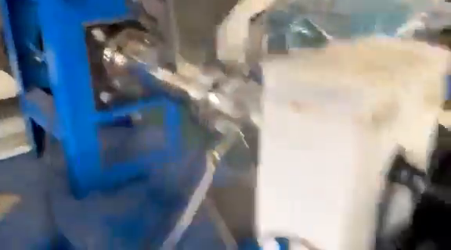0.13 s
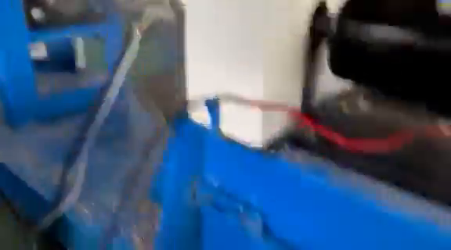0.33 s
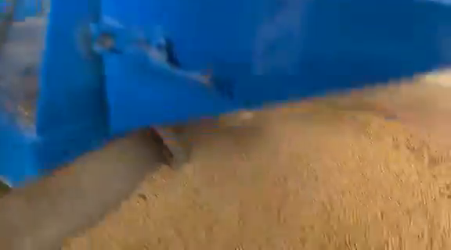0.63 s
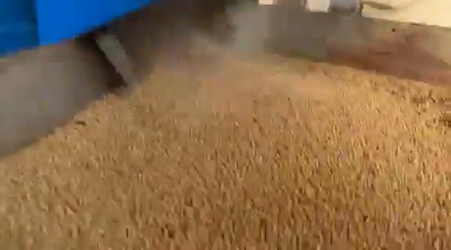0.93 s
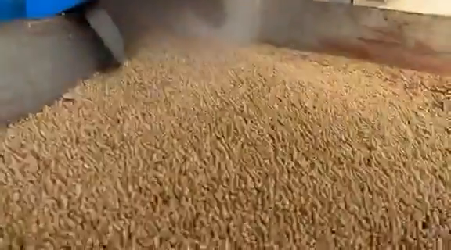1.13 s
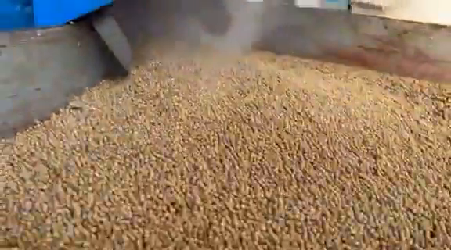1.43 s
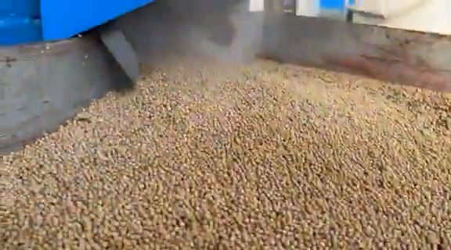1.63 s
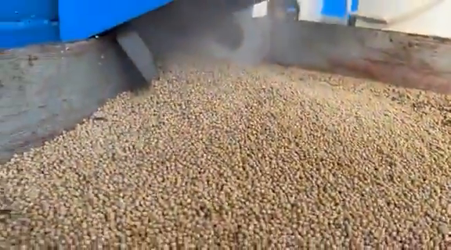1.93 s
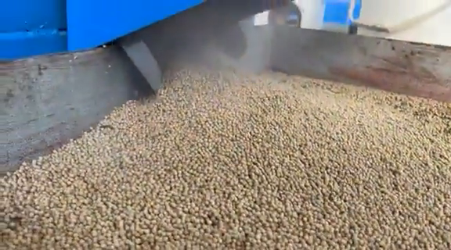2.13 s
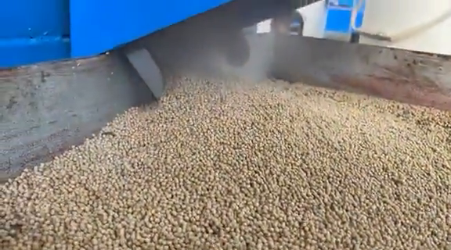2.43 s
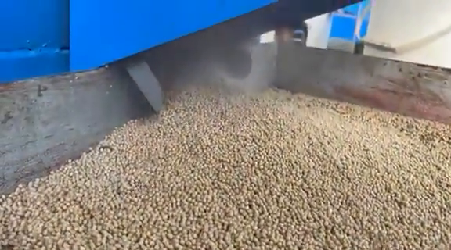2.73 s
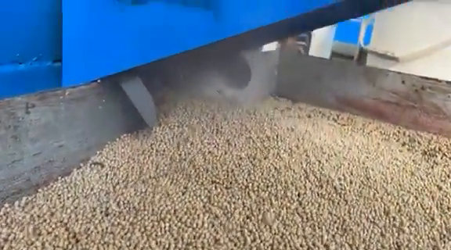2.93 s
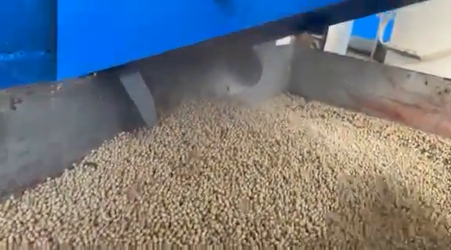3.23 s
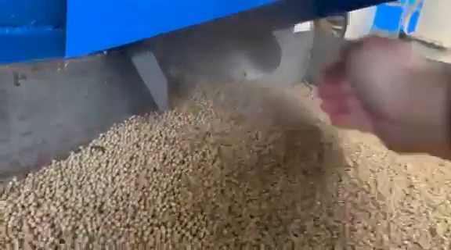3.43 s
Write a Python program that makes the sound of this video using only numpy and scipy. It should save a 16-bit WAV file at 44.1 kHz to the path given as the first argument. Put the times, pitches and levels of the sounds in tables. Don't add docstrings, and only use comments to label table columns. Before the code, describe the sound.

Loud steady machine drone and wavering motor whine first, then stronger hiss, fast blade chatter, metallic pings and pellet patter; close stereo microphone in a workshop, with faint handling rubs near the end.

```python
import sys
import numpy as np
from scipy import signal
from scipy.fft import rfft, irfft, next_fast_len
from scipy.io import wavfile

SR = 44100
rng = np.random.default_rng(int(sys.argv[2]) if len(sys.argv) > 2 else 0)


def invert_db(x):
    u = np.asarray(x, float) / 20
    return 10 ** u


def wrap_up_sound(samples):
    columns = np.atleast_2d(samples).T
    tamed = np.clip(columns, -1, 1)
    steps = np.round(tamed * 32767).astype(np.int16)
    wavfile.write(sys.argv[1], SR, steps)


N = 158319
TIME_S = np.arange(N) / SR
FFT_SIZE = next_fast_len(N, True)

# start_s, drone_db, hiss_db, cutter_db, cowl_db, pellets_db,
# thin_hiss_db
MIC_PLACE = [(0, 2, -3.5, -15, -31, -22, -52), (.35, -2.5, -2.5, -6.5, -39, 1, -57),
             (.75, -4.5, 0, 1.5, -44.5, -10, -55), (1.0, -1, -1, 0, -66, -5, -52.5),
             (1.5, -1.5, -1.5, 1, -67, 4.5, -71), (1.8, -0.5, -1, 0.5, -66, 5.5, -74),
             (2.05, 0, -1, -5, -64, 4, -62), (2.3, -0.5, -1, -4, -68, 6.5, -79),
             (2.8, 1.5, 0.5, 2, -47, 2, -70), (3.05, 0, 1, -1, -40, 2, -71),
             (3.3, 2.5, 1.5, 1.5, -40, 4, -54), (3.59, 1.5, 1, 1.5, -43, 7, -62)]

# pitch_hz, level_db (per Hz)
ROAR_MID = [(20, -99), (55, -63), (160, -67), (300, -64.5), (500, -61.5), (750, -68.5), (1100, -66),
            (2200, -72.5)]
# pitch_hz, level_db (per Hz)
ROAR_SIDES = [(40, -168), (200, -84), (350, -76), (600, -69.5), (900, -72), (1200, -67), (1690, -69.5),
              (2200, -78)]
# pitch_hz, level_db (per Hz)
HISS_MID = [(2200, -75), (5250, -74), (5450, -87), (7050, -86), (7350, -75), (9500, -75), (10150, -88),
            (11100, -91)]
# pitch_hz, level_db (per Hz)
HISS_SIDES = [(2200, -106), (2650, -80.5), (4500, -76.5), (6380, -82.5), (7600, -74), (8850, -81.5),
              (10100, -88.5), (12000, -84.5)]
# pitch_hz, width_hz, gain_db
FRAME_PANELS = [(227.3, 31, 14), (455, 73, 5.5), (851, 114, 7.5), (1693, 17, 9.5), (2660, 120, 4),
                (3405, 450, -1.5), (4750, 58, -2.5), (6190, 166, 12), (10100, 49, 2)]
# pitch_hz, left_minus_right_db
MIC_TILT = [(60, -3), (130, 2.5), (270, -1.5), (560, -1.5), (1180, -1), (2480, -0.5), (5220, -3.5),
            (11000, 1)]
# pitch_hz, left_lead_rad
MIC_LEAD = [(80, 0), (400, -.3), (900, 0.1), (1720, 1.3), (2760, -0.63), (5510, -1.54), (7750, -1.1),
            (10300, 1.8)]
LEAD_SHARE = 0.64

# low_hz, high_hz
THIN_HISS_BANDS = [(5400, 7100), (10100, 11500)]
# low_hz, high_hz
COWL_BAND = [840, 1006]
# start_s, length_s, level_db
FINGER_RUBS = [
    (1.96, .05, -44),
    (3.2, .07, -33),
    (3.34, .22, -38),
]
PELLETS_PER_S, PELLETS_DB = 2500, -48.5

# start_s, peak_db, pitch_hz
HOUSING_RINGS = [(0.9089, -42, 8660), (1.274, -29, 8730), (1.3624, -36, 8550), (1.4522, -34, 8700),
                 (1.4966, -35, 8130), (1.547, -30, 8770), (1.6738, -29.5, 8660), (1.763, -29, 8290),
                 (1.8064, -26, 8570), (1.8972, -25.5, 8600), (1.959, -32, 8800), (2.1705, -29, 8100),
                 (2.257, -26.5, 8700), (2.301, -23, 8590), (2.389, -28, 8130), (2.4369, -28, 8750),
                 (2.4838, -27, 8700), (2.5292, -33, 8480), (2.5721, -28.5, 8610), (2.6165, -28, 8130),
                 (2.6614, -33, 8730), (3.0645, -34, 8690), (3.1064, -33, 8680), (3.1708, -33, 8820),
                 (3.2062, -27, 8790), (3.302, -29, 8800), (3.3449, -33, 8600), (3.3798, -29, 8800),
                 (3.4701, -24.5, 8610), (3.506, -32, 8190)]
# start_s, peak_db, pitch_hz
GUARD_RATTLES = [(0.6495, -28, 4470), (0.7278, -26, 5150), (0.8311, -29, 4670), (1.0531, -31, 4340),
                 (1.1733, -26, 4700), (1.2776, -33, 4390), (1.3679, -34, 4560), (1.4582, -28, 4600),
                 (1.9031, -32, 4850), (2.5721, -38, 4540), (2.8814, -25, 4500), (3.0291, -38, 4560),
                 (3.0752, -30, 4630), (3.1204, -35, 4560), (3.1618, -32, 5130), (3.2017, -21, 5030),
                 (3.2426, -22, 4530), (3.4272, -31, 4940), (3.4716, -32, 5040), (3.5, -32, 5110)]

# share_of_turn, then low_db, middle_db, upper_db, top_db into the housing modes
BLADE_CONTACTS = [(0.1, 0, -8, -17, -11.5), (.24, 2, -12, 0.5, 0), (.33, 3, -10, -2, -2),
                  (.41, -1, 3, 2.5, -2), (.97, -14.5, -1, -12, -12)]
# pitch_hz, level_db, t60_s, left_minus_right_db
HOUSING_MODES = [(2756, -52, 0.025, -1.1), (3400, -34, 0.018, -3), (4550, -42, 0.01, -6),
                 (8640, -39, 0.014, 0.1)]
BLADE_SCATTER_DB, BLADE_JITTER_S, SCRAPE_S = 2.5, 0.0005, 0.0025

# multiple_of_turn, left_db, right_db
SHAFT_ORDERS = [(8, -55, -53), (10, -50, -47), (12, -47, -42), (19, -49, -50), (20, -45, -45),
                (52, -62, -49)]
# pitch_hz, width_hz, left_db, right_db
GEAR_TONES = [(147.6, 3, -44, -44), (217.8, 5, -48, -46), (232.3, 5, -48, -46), (454, 8, -45, -45),
              (590, 2.5, -46, -46), (625, 20, -47, -47), (713, 4, -50, -53), (814, 4, -48, -45)]
# start_s, left_db, right_db, left_lead_rad
SHAFT_DRONE = [(0.06, -37, -39, -0.51), (0.33, -33, -30.5, -0.3), (0.6, -34.5, -32, -0.18),
               (0.88, -37, -29.5, -0.045), (1.3, -39, -33, -0.0), (2.05, -42, -31, -0.0),
               (2.55, -41, -30, -0.13), (3.0, -31.5, -24.5, -0.1), (3.35, -35, -30, -0.066)]

# start_s, left_db, right_db, left_lead_rad
SLOT_WHINE = [(0.06, -27, -21, 0.5), (0.2, -24.5, -24, -0.0), (0.33, -25.5, -25.5, 0.8),
              (0.46, -25, -33.5, 1.5), (0.6, -26, -28, 1.5), (0.74, -30.5, -30.5, 1), (0.88, -36, -45, 0.5),
              (1.05, -35, -31.5, -4), (1.3, -36, -31.5, -4.5), (1.8, -29.5, -32, -3),
              (2.05, -30.5, -30, -3.5), (2.3, -28.5, -28.5, -3), (2.55, -27.5, -32, -2.5),
              (2.8, -30, -34, -3.2), (3.0, -32, -39, -2.7), (3.15, -32.5, -38, -0.8),
              (3.35, -28.5, -29, -1.9), (3.52, -30, -29, -1.8)]
# start_s, left_db, right_db, left_lead_rad
LOWER_WHINE = [(0.06, -38, -36, 0.38), (0.33, -34.5, -34, 0.68), (0.6, -30.5, -31.5, 0.88),
               (0.88, -31.5, -39, 0.49), (1.3, -31, -44, 0.89), (2.05, -31, -38, 1),
               (2.55, -32.5, -37.5, 1), (3.0, -34.5, -33, 1), (3.35, -34.5, -33.5, 0.27)]
# start_s, level_db
FIRST_HUM = [(0.1, -47.5), (0.41, -48.5), (0.72, -39), (1.03, -41), (1.34, -39.5), (1.65, -41.5),
             (1.95, -36.5), (2.26, -45.5), (2.57, -42), (2.88, -37), (3.19, -39.5), (3.5, -39)]
# start_s, depth (0-1)
WHINE_THROB = [(0, .33), (.45, .36), (.8, .2), (1.4, .1), (3.0, .12), (3.59, .2)]
# motor_turns_off, below_whine_db
WHINE_SIDEBANDS = [(-2, -18), (-1, -23), (1, -23), (2, -21)]
# slot_multiple, hum_steps, left_db, right_db, left_lead_rad
MAGNETIC_LINES = [(0, 2, -39, -38, -.1), (0, 3, -58, -51, -.3), (0, 4, -43, -42, -.5),
                  (1, -2, -51, -56, 1.5), (1, 1, -47, -53, 1.6), (2, -1, -47, -46, 2.1),
                  (2, -2, -55, -57, 2.1)]
SLOT_HZ, HUM_HZ, MOTOR_TURN_HZ, CUTTER_TURN_HZ = 889.4, 100.0, 24.6, 22.254
THROB_HZ, THROB_RAD = 24.7, 1.75


def rms_one(x):
    return x / np.sqrt(np.mean(x ** 2) + 1e-20)


def stereo_gain(left_db, right_db):
    return invert_db(np.array([[left_db], [right_db]]))


def in_time(rows):
    start_s, *columns = np.transpose(rows)
    return [np.interp(TIME_S, start_s, column) for column in columns]


def at_hz(points, hz):
    point_hz, value = np.transpose(points)
    return np.interp(np.log(hz), np.log(point_hz), value)


def drift(rate_hz):
    r = np.exp(-80 * np.pi * rate_hz / SR)
    draws = rng.standard_normal(N // 40 + 2002)
    slow = signal.lfilter([1], [1, -2 * r, r * r], draws)[2000:]
    return np.interp(np.arange(N) / 40, np.arange(len(slow)), rms_one(slow - slow.mean()))


def tone(hz, left_db, right_db, left_lead_rad, wobble_db, wander_rad):
    phase = 2 * np.pi * (hz * TIME_S + rng.random()) + wander_rad * drift(7.7)
    gain = np.sqrt(2) * invert_db(wobble_db * drift(4.6))
    left = invert_db(left_db) * np.sin(phase + left_lead_rad)
    right = invert_db(right_db) * np.sin(phase)
    return gain * np.array([left, right])


def ring(push, hz, t60_s):
    r, w = invert_db(-60 / (t60_s * SR)), 2 * np.pi * hz / SR
    return signal.lfilter([0, np.sin(w)], [1, -2 * r * np.cos(w), r * r], push + 1e-18)


def band_noise(white, band_hz):
    return signal.sosfilt(signal.butter(3, band_hz, "band", fs=SR, output="sos"), white)


def coloured(spectrum, slow_db, fast_db):
    hz = np.maximum(np.arange(FFT_SIZE // 2 + 1) * SR / FFT_SIZE, 1)
    level_db = at_hz(spectrum, hz)
    for panel_hz, width_hz, gain_db in FRAME_PANELS:
        level_db = level_db + gain_db / (1 + (2 * (hz - panel_hz) / width_hz) ** 2)
    low_hz, high_hz = spectrum[0][0], spectrum[-1][0]
    inside = (hz > low_hz) & (hz < high_hz)
    noise = rfft(rng.standard_normal(FFT_SIZE)) * invert_db(level_db) * inside * np.sqrt(SR / 2)
    octave = np.log2(hz / low_hz)
    together_db = slow_db * drift(6.1)
    out = np.zeros(N)
    for k in range(8):
        if k < octave[inside].max() + 1:
            window = np.cos(np.pi / 2 * np.clip(octave - k, -1, 1)) ** 2
            out += irfft(noise * window, FFT_SIZE)[:N] * invert_db(together_db + fast_db * drift(24.3))
    return out


def spread(mid, side):
    hz = np.maximum(np.arange(FFT_SIZE // 2 + 1) * SR / FFT_SIZE, 1)
    tilt = invert_db(at_hz(MIC_TILT, hz) / 2)
    lag = np.exp(0.5j * LEAD_SHARE * at_hz(MIC_LEAD, hz))
    mid, side = rfft(mid, FFT_SIZE), rfft(side, FFT_SIZE)
    left = (mid * lag + side) * tilt
    right = (mid / lag - side) / tilt
    return irfft(np.array([left, right]), FFT_SIZE)[:, :N]


def roar_and_hiss(drone_db, hiss_db):
    mid = invert_db(0.44 * drone_db) * coloured(ROAR_MID, 0.3, 0.8)
    mid += invert_db(hiss_db) * coloured(HISS_MID, 0.3, 1.1)
    side = invert_db(0.47 * drone_db) * coloured(ROAR_SIDES, 0.9, 0.68)
    side += invert_db(1.05 * hiss_db) * coloured(HISS_SIDES, 0.32, 0.75)
    return spread(mid, side)


def thin_hiss(thin_hiss_db):
    white = rng.standard_normal(N)
    thin = sum(band_noise(white, band_hz) for band_hz in THIN_HISS_BANDS)
    return invert_db(thin_hiss_db + 2.0 * drift(6.0)) * rms_one(thin)


def motor_cowl(cowl_db):
    return invert_db(cowl_db) * rms_one(band_noise(rng.standard_normal(N), COWL_BAND))


def handling():
    dull = signal.butter(2, [180, 520], "band", fs=SR, output="sos")
    rub = rms_one(signal.sosfilt(dull, rng.standard_normal((2, N))))
    swell = np.zeros(N)
    for start_s, length_s, level_db in FINGER_RUBS:
        middle_s = start_s + length_s / 2
        swell += invert_db(level_db) * np.exp(-(2 * (TIME_S - middle_s) / length_s) ** 2)
    return rub * swell


def pellets(pellets_db):
    sizes = invert_db(5 * np.minimum(rng.exponential(1, N), 4)) * rng.choice([-1, 1], N)
    born = rng.random(N) < PELLETS_PER_S * invert_db(4 * drift(7.0)) / SR
    dealt = rng.integers(0, 10, N)
    ticks = []
    for k, hz in enumerate(np.linspace(7300, 9600, 10)):
        ticks.append(ring(sizes * born * (dealt == k), hz, 30 / hz))
    left = sum(ticks) + 0.89 * sum(ticks[::2])
    right = sum(ticks) + 0.17 * sum(ticks[1::2])
    return invert_db(pellets_db + PELLETS_DB) * rms_one(np.array([left, right]))


def strokes(rows, gain_db, t60_s, left_minus_right_db):
    out, after_s = np.zeros(N + SR), np.arange(SR // 20) / SR
    rise = 1 - np.exp(-after_s / 0.002)
    for start_s, peak_db, hz in rows:
        fall = invert_db(peak_db + gain_db - 60 * after_s / t60_s)
        first = int(start_s * SR)
        out[first:first + len(after_s)] += 2 * fall * rise * np.sin(2 * np.pi * hz * after_s)
    return out[:N] * stereo_gain(left_minus_right_db / 2, -left_minus_right_db / 2)


def housing_rings():
    return strokes(HOUSING_RINGS, -4, 0.04, 0.1)


def guard_rattles():
    return strokes(GUARD_RATTLES, -5, 0.02, -5)


def cutter(cutter_db):
    turns = np.arange(int(N / SR * CUTTER_TURN_HZ) + 1)
    after = np.arange(400)
    scrapes = rng.standard_normal((len(BLADE_CONTACTS), len(after))) * np.exp(-after / SR / SCRAPE_S)
    out = np.zeros((2, N))
    for m, (hz, mode_db, t60_s, left_minus_right_db) in enumerate(HOUSING_MODES):
        push = np.zeros(N + SR)
        for (share, *into_mode_db), scrape in zip(BLADE_CONTACTS, scrapes):
            jitter_s = BLADE_JITTER_S * rng.standard_normal(len(turns))
            start_s = (turns + share) / CUTTER_TURN_HZ + jitter_s
            scatter_db = BLADE_SCATTER_DB * rng.standard_normal(len(turns))
            size = invert_db(into_mode_db[m] + mode_db + scatter_db)
            places = (start_s * SR).astype(int)[:, None] + after
            push[places] += size[:, None] * scrape / np.linalg.norm(scrape)
        pan = stereo_gain(left_minus_right_db / 2, -left_minus_right_db / 2)
        out += ring(push, hz, t60_s)[:N] * pan
    return invert_db(cutter_db) * out


def drive(drone_db):
    out = np.zeros((2, N))
    for order, left_db, right_db in SHAFT_ORDERS:
        out += tone(order * CUTTER_TURN_HZ, left_db, right_db, -0.15, 1.2, 0.12)
    for hz, width_hz, left_db, right_db in GEAR_TONES:
        gear = ring(rng.standard_normal(N), hz, 2.2 / width_hz)
        out += rms_one(gear) * stereo_gain(left_db, right_db)
    return invert_db(drone_db) * out + tone(11 * CUTTER_TURN_HZ, *in_time(SHAFT_DRONE), 0.8, 0.1)


def motor(drone_db):
    left_db, right_db, lead_rad = in_time(SLOT_WHINE)
    depth, = in_time(WHINE_THROB)
    hum_db, = in_time(FIRST_HUM)
    throb = 1 + depth * np.cos(2 * np.pi * THROB_HZ * TIME_S + THROB_RAD)
    out = throb * tone(SLOT_HZ, left_db, right_db, lead_rad, 0.5, 0.05)
    out += tone(HUM_HZ, hum_db, hum_db, 0, 1, 0.1)
    out += tone(SLOT_HZ - HUM_HZ, *in_time(LOWER_WHINE), 0.5, 0.05)
    for turns, below_db in WHINE_SIDEBANDS:
        hz = SLOT_HZ + turns * MOTOR_TURN_HZ
        out += tone(hz, left_db + below_db, right_db + below_db, 0.3 * lead_rad, 3, 0.5)
    for slots, hums, line_left_db, line_right_db, line_lead_rad in MAGNETIC_LINES:
        hz = slots * SLOT_HZ + hums * HUM_HZ
        out += invert_db(0.7 * drone_db) * tone(hz, line_left_db, line_right_db, line_lead_rad, 1.6, 0.25)
    return out


def scene():
    drone_db, hiss_db, cutter_db, cowl_db, pellets_db, thin_hiss_db = in_time(MIC_PLACE)
    out = roar_and_hiss(drone_db, hiss_db)
    out += thin_hiss(thin_hiss_db) + motor_cowl(cowl_db) + handling()
    out += pellets(pellets_db) + housing_rings() + guard_rattles()
    return out + cutter(cutter_db) + drive(drone_db) + motor(drone_db)


def low_pass(x):
    return signal.sosfilt(signal.butter(12, 11500, fs=SR, output="sos"), x)


def record(dry):
    return low_pass(dry)


dry = scene()
out = record(dry)
wrap_up_sound(out)
```